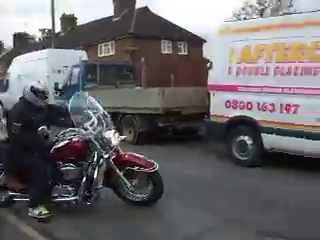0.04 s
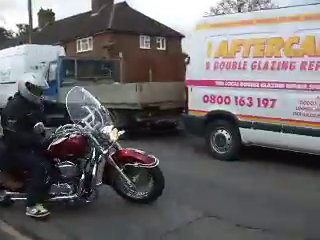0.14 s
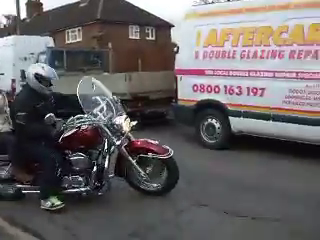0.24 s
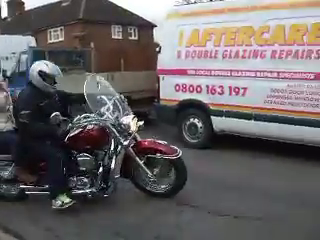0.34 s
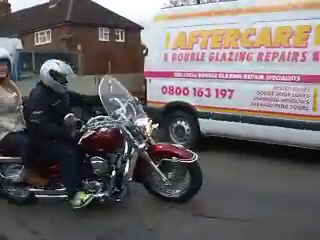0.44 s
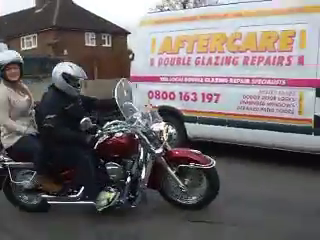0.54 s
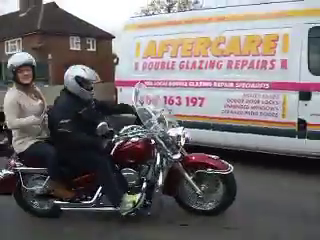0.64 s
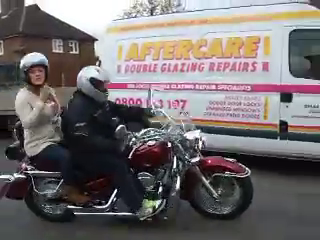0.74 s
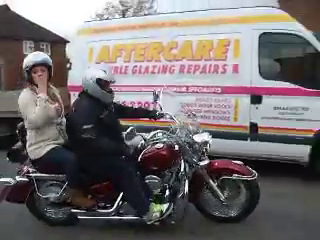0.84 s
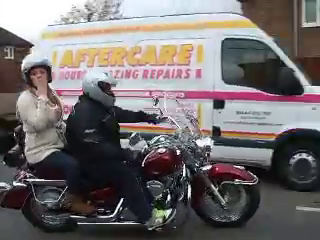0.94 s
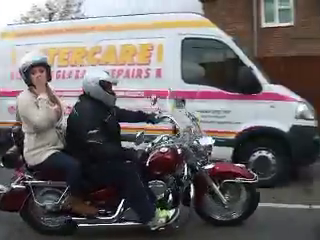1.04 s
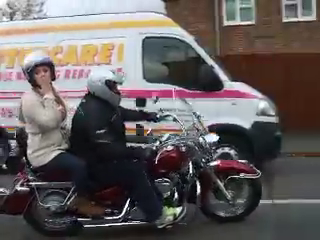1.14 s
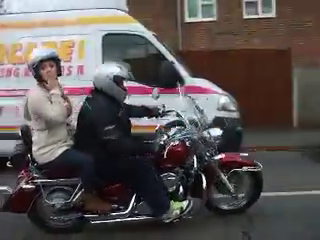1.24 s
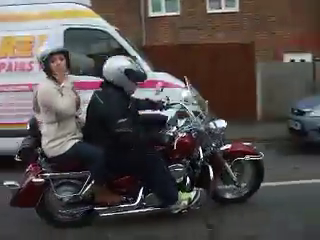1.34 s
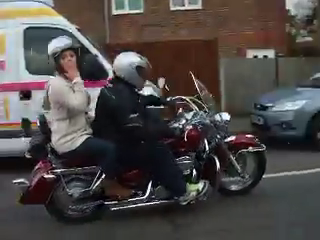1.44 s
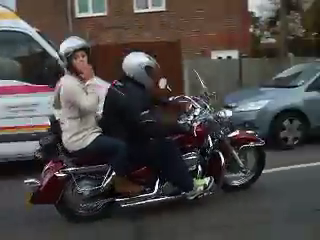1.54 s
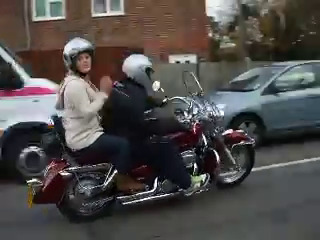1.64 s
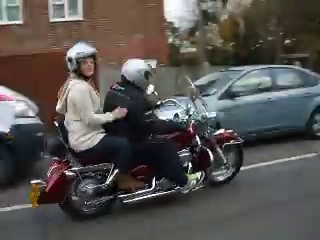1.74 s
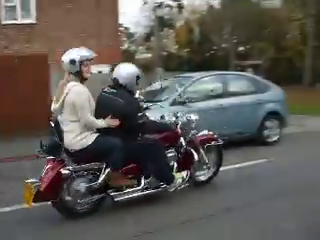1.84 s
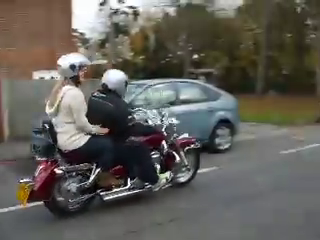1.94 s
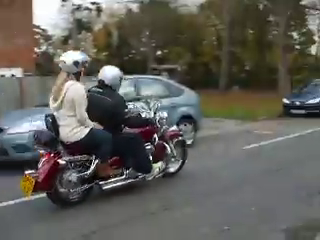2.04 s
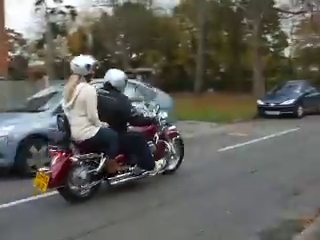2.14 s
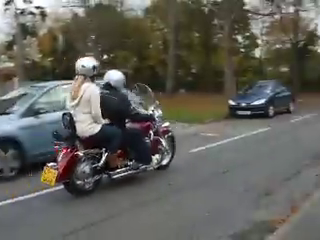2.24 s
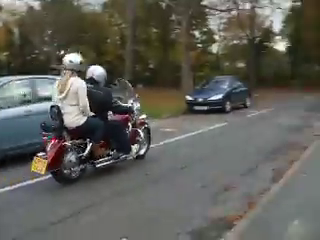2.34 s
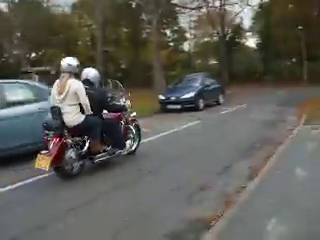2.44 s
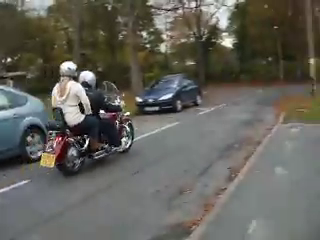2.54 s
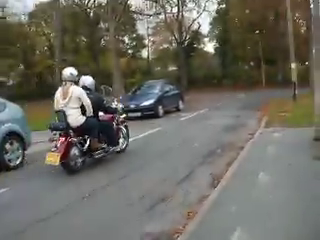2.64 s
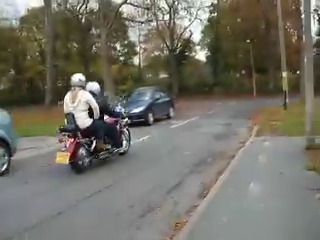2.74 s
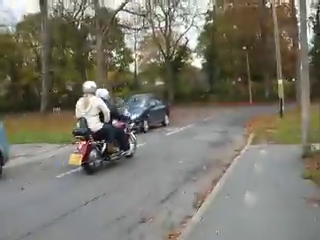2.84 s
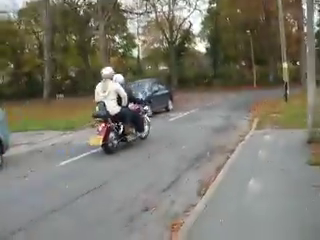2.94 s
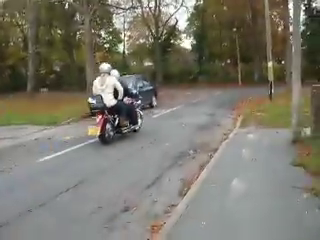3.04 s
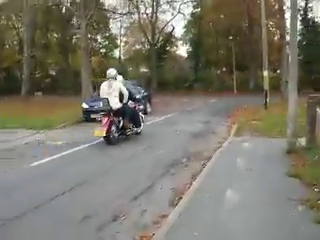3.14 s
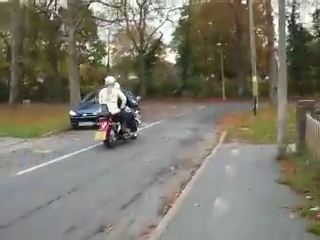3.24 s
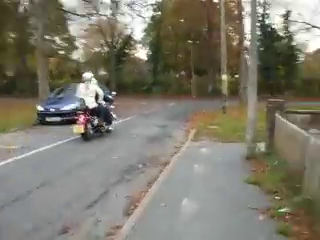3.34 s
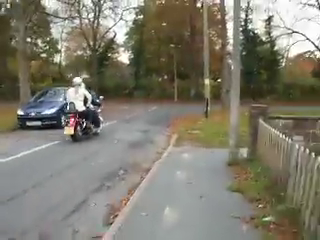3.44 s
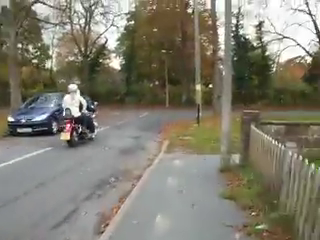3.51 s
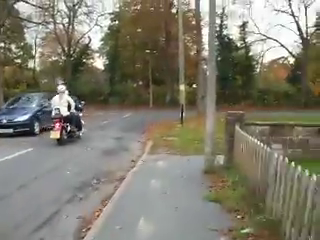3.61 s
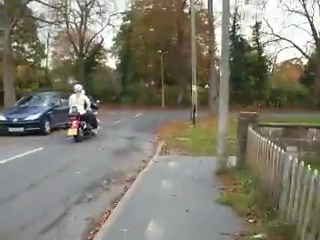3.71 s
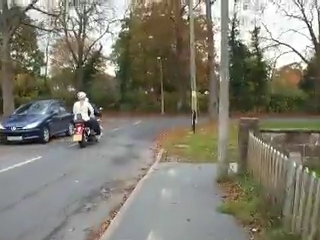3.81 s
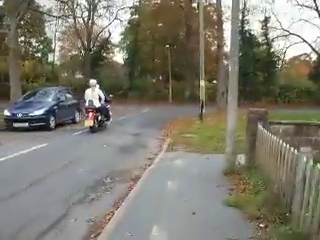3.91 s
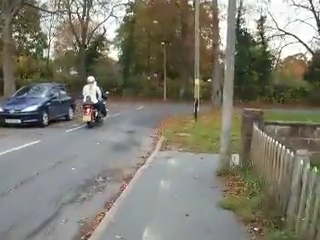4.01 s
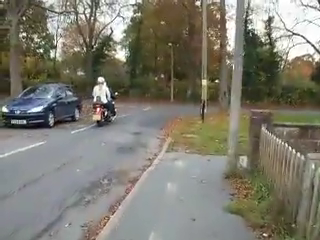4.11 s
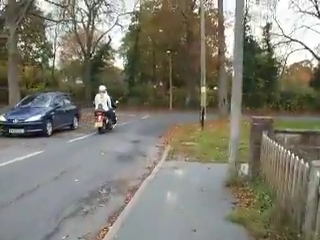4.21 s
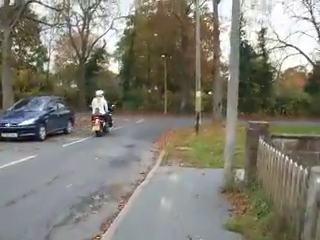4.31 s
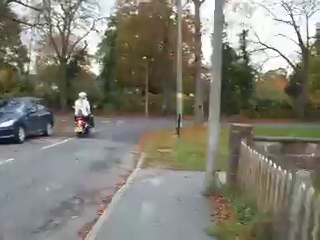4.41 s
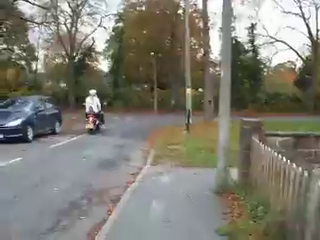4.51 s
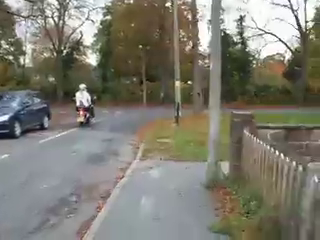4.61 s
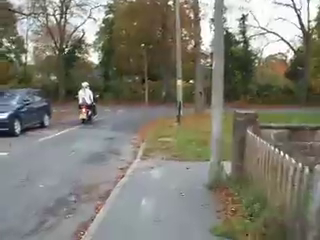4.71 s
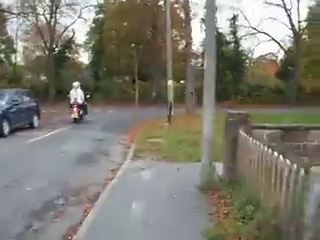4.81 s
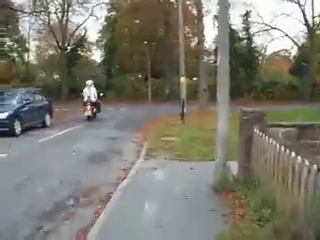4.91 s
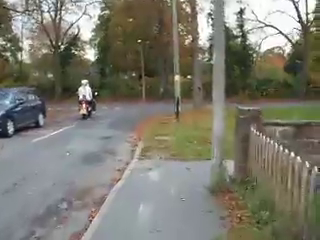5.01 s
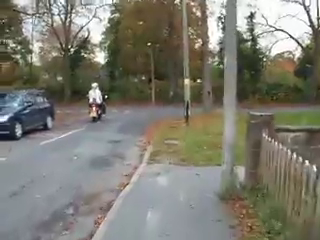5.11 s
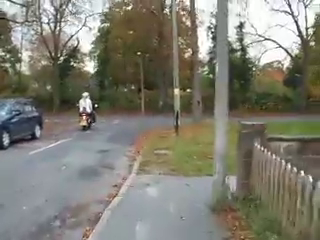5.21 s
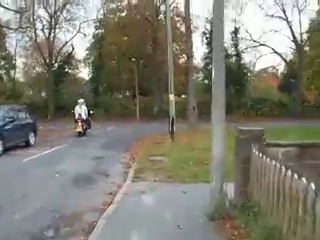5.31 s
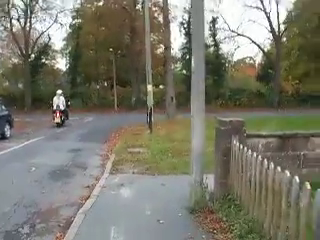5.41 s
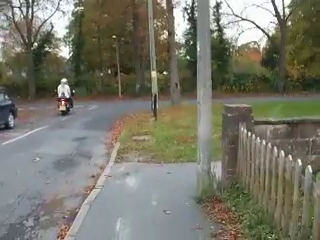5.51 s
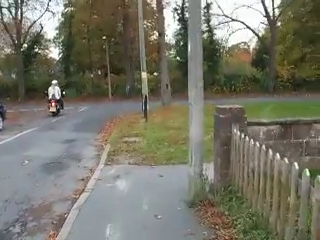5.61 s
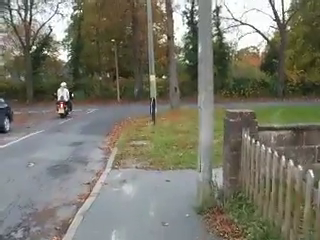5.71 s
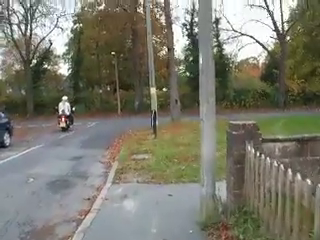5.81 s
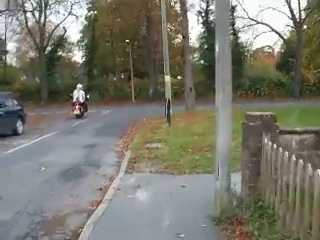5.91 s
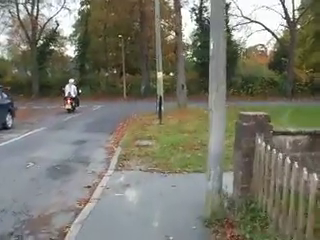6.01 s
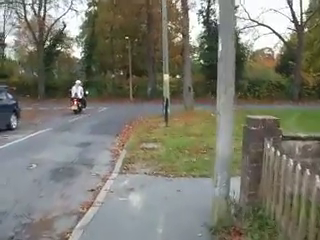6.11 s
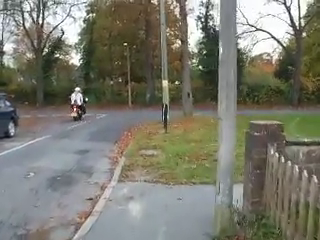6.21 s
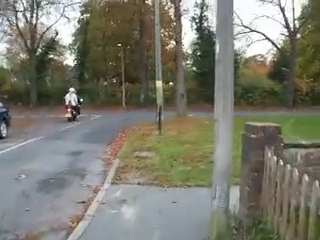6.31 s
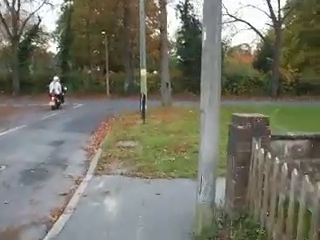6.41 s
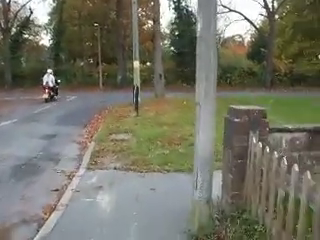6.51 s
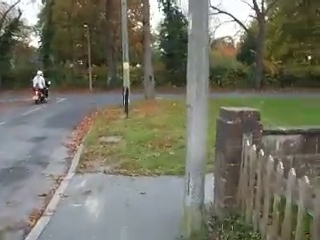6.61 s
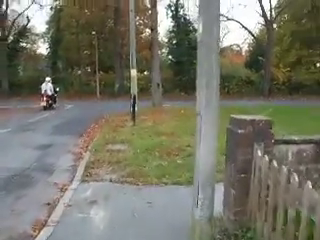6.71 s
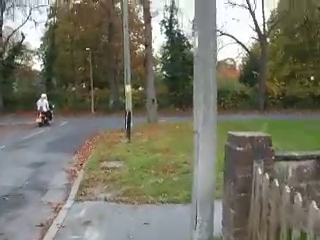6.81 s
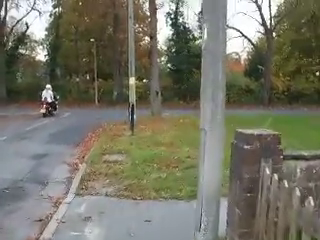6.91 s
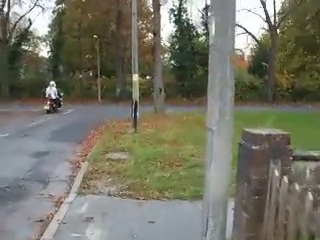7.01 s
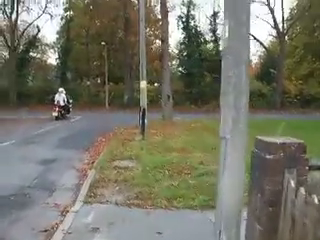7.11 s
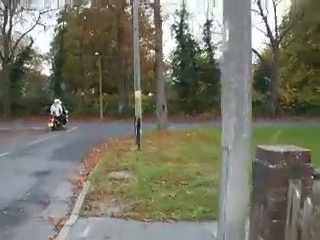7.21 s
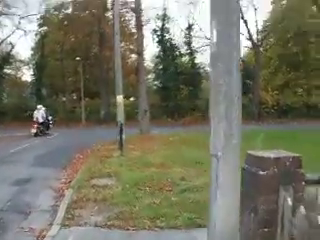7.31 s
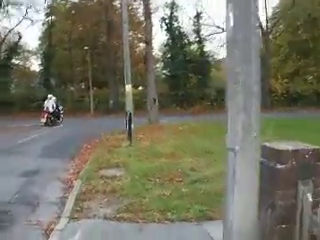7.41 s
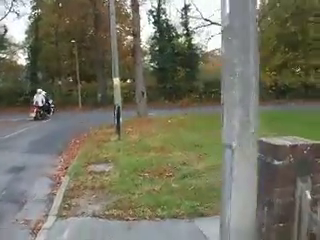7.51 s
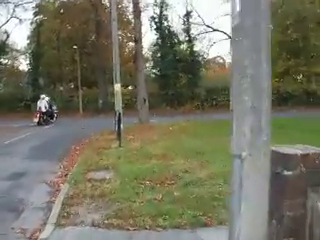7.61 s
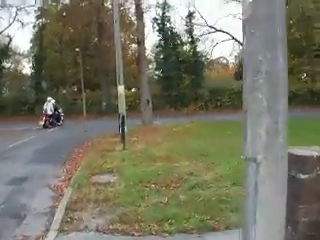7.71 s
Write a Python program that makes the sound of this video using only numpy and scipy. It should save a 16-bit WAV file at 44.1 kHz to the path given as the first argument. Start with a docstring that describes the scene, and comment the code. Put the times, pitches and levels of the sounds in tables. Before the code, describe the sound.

Outdoors at a kerb, a V-twin cruiser with open pipes pulls away about three metres off, loud, bassy and crackling, its uneven beat quickening. After three seconds the throttle shuts; a softer limping chug rolls on with dull pops and a brief howl. A sharp blip near six seconds, a short lull, then it accelerates into the distance. Light wind and road noise; the small camera microphone distorts on the loud beats.

```python
"""Suburban street, one microphone at the kerb: a V-twin cruiser with open pipes pulls away about 3 m off.
It turns its tail, shuts the throttle and rolls on beyond 10 m with a chug, dull pops and one brief howl,
then blips through a gear change and accelerates to nearly 50 m. Uneven pairs of firings send pressure slugs
into resonant pipes, with gas rush, rings and cracks from noise and sines. Delays and a diffuse tail echo
the firings; road noise, gusty wind and short low pops of noise lie beneath."""
import sys
import numpy as np
from scipy import signal
from scipy.fft import rfft, irfft
from scipy.io import wavfile
from scipy.ndimage import uniform_filter1d

SR = 44100
rng = np.random.default_rng(int(sys.argv[2]) if len(sys.argv) > 2 else 0)


def master(y):
    """Save y as 16-bit WAV."""
    cut = np.clip(np.atleast_2d(y).T, -1, 1)
    pcm = np.round(cut * 32767)  # scale
    wavfile.write(sys.argv[1], SR, pcm.astype(np.int16))


N = 341775
T = np.arange(N) / SR  # time in the scene, s
AROUND = np.arange(-600, 3000) / SR  # time around one event, s

# Road noise: roar and hiss colours, both (frequency [Hz], relative level [dB]); the hiss also colours the pops
ROAD_COLOUR = [(150, 4.5), (250, -1.5), (380, -3.5), (500, -3.5), (650, -0.5), (800, -10.5), (950, -22),
               (1300, -14), (2000, -32)]
HISS_COLOUR = [(1000, -22.5), (1700, -2.5), (2430, -7), (2640, 0), (3320, -1.5), (3740, -6.5), (4750, -5),
               (5600, -14), (7280, -39), (12300, -120)]
# Road noise level: (time [s], roar [dB], hiss [dB])
ROAD_LEVEL = [(0, -32, -45), (1.7, -42.5, -47), (2.8, -34, -49.5), (3.4, -44.5, -54), (3.83, -31, -49.5),
              (3.9, -32.5, -42.5), (3.98, -32, -51), (5, -30, -52), (6.4, -36.5, -54.5), (7.75, -35.5, -52)]
# Low rumble of the wind and of the short dull pops: (frequency [Hz], relative level [dB])
RUMBLE_COLOUR = [(20, -22.5), (35, 0.5), (65, -1), (120, -1), (220, -1.5), (350, -6.5), (600, -21.5),
                 (1200, -31)]
# Gusts on the microphone, and short dull low pops among them: (time [s], half length [s], level [dB])
GUSTS_AND_LOW_POPS = [(1.2, 2.8, -29), (3.12, 0.17, -38), (4.403, 0.16, -29), (4.775, 0.048, -28.5),
                      (4.915, 0.047, -21), (5.066, 0.071, -27), (5.182, 0.043, -27), (6.037, 0.11, -23.5),
                      (6.31, 0.011, -28), (6.437, 0.071, -30.5), (7.553, 0.72, -26.5)]
BREEZE_DB = -35

# Reflection from the nearest van or house front as the bike moves on:
# (time [s], delay [s], echo level [dB], drone drive at full throttle [dB])
WALL = [(0, 0.013, -13, 1), (.6, 0.014, -6, 3), (1.2, .012, -16, -5), (2, 0.0095, -15.5, -5),
        (2.9, 0.017, -0.5, -26), (3.4, .0098, -10.5, -7.5), (5.5, 0.0091, -9.5, -10),
        (7.75, 0.011, -19, -5)]
# Later echoes from across the street: (delay [s], level [dB])
ECHOES = [(0.0232, -13), (0.056, -25)]
STREET_T60_S, STREET_DB = 0.75, -9.5

# Bike to microphone: (time [s], distance [m])
DISTANCE = [(0, 2.95), (1.5, 2.82), (2.2, 4.75), (3, 9.4), (5, 11), (7.75, 48)]
NEAR_M = 3  # distance to which the loudness laws refer
# Throttle while pulling away, shut, trailing, blipped, shut, pulling again: (time [s], opening [0-1])
THROTTLE = [(0, 0.91), (1.8, 0.94), (2.94, 0.91), (3.0, 0.37), (3.12, 0.42), (3.5, 0), (3.78, 0.35),
            (5.2, 0.25), (5.93, 0.47), (5.98, 0.82), (6.02, 1), (6.07, 0.96), (6.11, 0.55), (6.27, 0),
            (6.55, 0.38), (6.7, 0.53), (6.95, 0.72), (7.08, 1), (7.75, 1)]
# Crank speed: (time [s], four-stroke cycles per second [Hz])
SPEED = [(0.0, 11.648), (0.56, 11.973), (1.04, 10.878), (2.22, 15.705), (2.95, 18.975), (3.29, 11.87),
         (3.75, 11.181), (3.96, 8.919), (5.2, 8.866), (5.93, 8.296), (6.02, 12.595), (6.14, 11.913),
         (6.38, 8.379), (6.88, 8.048), (7.1, 11.532), (7.25, 12.906), (7.75, 12.853)]
START_TURN = .085  # share of a cycle already turned at the start
# Rear firing after the front one: (cycles per second [Hz], share of a cycle [0-1])
REAR_LAG = [(12, .412), (18, .402)]
# Treble beamed by the pipes as the bike passes and turns its tail:
# (time [s], front crack [dB], rear crack [dB], gas rush [dB])
AIM = [(0, -2.5, -3, 4), (1.1, 0.5, 0.5, -0.5), (1.85, 3, 2, -2), (2.45, 4, -2, -5.5),
       (2.9, 0.5, -3.5, -6.5), (4, 3, 2, 4.5), (7.75, 1.5, -3, 2)]
# Off load the front cylinder gives less than the rear one, which leaves a slow chug
LIMP_THUMP_DB, LIMP_GAS_DB = -9, -7

# Single exhaust pops, on the trailing throttle and at the blip: (time [s], push level [dB], spit level [dB])
POPS = [(4.406, -7.5, -39), (4.886, -10, -26.5), (4.941, -8.5, -44), (5.099, -8.5, -44), (5.223, -9.5, -36),
        (6.023, -14.5, -15.5)]
# Brief howl in the pipes on the trailing throttle: (time [s], half length [s], level [dB])
HOWL = (4.4, 0.042, -29.5)
# Notes of the howl, applied twice: (frequency [Hz], width per pass [Hz], gain per pass [dB])
HOWL_NOTES = [(283, 10, -3), (350, 12, -8), (410, 8.4, -7)]

# Loudness laws of body, barks, cracks, gas rush and thumps, each one row:
# (level near by at full throttle [dB], loss on a shut throttle [dB], loss per doubling of distance [dB]);
# the losses with distance are small because the pipes come to aim at the microphone
BODY_LAW = (-15, 25.4, 0.96)
BARK_LAW = (-32.5, 1.2, 0.21)
CRACK_LAW = (-20, 30.6, 0.83)
GAS_LAW = (-20.5, 11, 0.16)
THUMP_LAW = (0.84, 9.9, 3.59)

# Hollow middle of a firing, heard along the pipes: (frequency [Hz], relative level [dB])
BODY_COLOUR = [(420, -4.5), (620, 3), (900, -3), (1250, -9.5), (1750, -5.5), (2000, -18), (2250, -0.5),
               (2700, -20.5)]
# Higher pipe resonances that bark: (frequency [Hz], level from the side [dB], level from behind [dB])
BARKS = [(337, -13, -11.5), (437, -23.5, -10.5), (615.6, -24.5, 1), (696, -20, -4.5), (788.6, -3, -14)]
BARK_SLIDE_PER_S = 0.94  # relative rise of pitch on a shut throttle
# Rush of the cracking jet: (frequency [Hz], relative level [dB])
CRACK_COLOUR = [(900, -27), (1400, -12), (1750, -7.5), (2050, -16.5), (2500, 0.5), (3000, 3.5), (3600, 1.5),
                (4400, -8), (5100, -5.5), (6000, -34)]
# Rings of the pipe mouths: (frequency [Hz], front pipe level [dB], rear pipe level [dB])
MOUTHS = [(1365, -9, -14.5), (1750, -12.5, -6.5), (2240, -6, -7), (2800, 1, -8.5), (3450, -3.5, -6.5)]
# Main ring of each mouth, wandering with the heat of the gas: (time [s], front pipe [Hz], rear pipe [Hz])
MAIN_RING = [(0, 2800, 2520), (.4, 2770, 2270), (.55, 2520, 3620), (1.1, 2810, 3095), (1.9, 3030, 3750),
             (2.3, 3055, 3450), (2.8, 3430, 3410), (3.5, 3096, 3180), (7.3, 3160, 3310), (7.75, 2690, 3270)]
MAIN_RING_DB = 4  # at full throttle
# Firings that crack harder, or softer where negative: (time [s], extra crack level [dB])
HARD_FIRINGS = [(.5, 4), (1.404, 2.5), (1.711, 7.5), (1.783, -2), (1.896, 4.5), (1.965, 4.5), (2.228, -1.5),
                (2.291, 1.5), (2.473, 4), (2.759, 3), (5.64, 6), (6.705, 7), (7.295, 2.5), (7.527, 2)]
# Gas rush from the side and from behind: (frequency [Hz], relative level [dB])
GAS_SIDE = [(250, -26), (350, -26), (500, -3), (650, -6), (800, 5.5), (1050, -3.5), (1350, -8), (1800, -8),
            (3000, -13)]
GAS_BEHIND = [(200, -3.5), (350, -10.5), (500, 5), (680, 8.5), (820, -12), (1000, -8.5), (1400, -11),
              (1750, -21), (2100, -16.5), (2500, -16), (3200, -39.5)]

# Slug of gas at low revs, front pipe then rear:
# (half width [s], suction share [0-1], suction half width [s], level [dB])
SLUGS = [(0.0016, 0.31, 0.0058, -8.5), (0.0014, 0.25, 0.0069, -2.5)]
# Resonances of the front and rear pipe from the side, and of both from behind:
# (frequency [Hz], width [Hz], gain [dB])
FRONT_PIPE = [(80.1, 17, 11.5), (192.6, 121, 7.5), (358, 7.5, 15)]
REAR_PIPE = [(111.7, 21.3, 6.5), (186, 18, -18.5), (254, 6.6, -11.5)]
PIPE_BEHIND = [(68, 65, -5), (99.2, 11, 7), (188.6, 21, 0.5), (268.7, 12, 3.5)]
# Low note that builds up in the pipes, from the side and from behind, applied twice:
# (frequency [Hz], width per pass [Hz], gain per pass [dB])
DRONE_SIDE = [(128.7, 39, 0.46)]
DRONE_BEHIND = [(121.5, 27, 6.3)]
DRONE_LATE_S = 0.0038  # on top of the wall delay

# Microphone: overload knee and hard clip [full scale = 1], upper band edge, final low-pass
OVERLOAD_LEVEL, CLIP_LEVEL, BAND_HZ, TOP_HZ = .76, .69, 5650, 15500


def undb(db):
    """Decibels to gain."""
    return 10 ** (np.asarray(db) / 20)


def read(table, times):
    """Every column of a curve at the given times."""
    s, *columns = np.transpose(table)
    return [np.interp(times, s, c) for c in columns]


def unit(x):
    """Scale to rms 1."""
    return x / np.sqrt(np.mean(x ** 2))


def lowpass(x, order, hz):
    """Butterworth low-pass."""
    return signal.sosfilt(signal.butter(order, hz, fs=SR, output="sos"), x)


def noise(colour):
    """Noise of rms 1 with a (Hz, dB) spectrum that falls away beyond its ends."""
    hz, db = np.transpose(colour)
    f = np.maximum(np.fft.rfftfreq(N, 1 / SR), 1)
    skirts = np.minimum(f / hz[0], 1) ** 2 * np.minimum(hz[-1] / f, 1) ** 2
    gain = skirts * undb(np.interp(np.log(f), np.log(hz), db))
    return unit(irfft(rfft(rng.standard_normal(N)) * gain, N))


def walk(rate):
    """Random levels held 1 / rate s and smoothed twice, scaled to rms 1."""
    hold = int(SR / rate)
    steps = np.repeat(rng.standard_normal(N // hold + 1), hold)
    return unit(uniform_filter1d(uniform_filter1d(steps, hold), hold)[:N])


def resonate(x, modes):
    """Sum of (Hz, width Hz, dB) resonances driven by x."""
    return sum(undb(db) * signal.lfilter(*signal.iirpeak(hz, hz / width, fs=SR), x) for hz, width, db in modes)


def place(times, shapes):
    """Lay one short shape per event (on the AROUND axis) at its time."""
    index = np.round((times[:, None] + AROUND) * SR).astype(int)
    inside = (index >= 0) & (index < N)
    return np.bincount(index[inside], shapes[inside], N)


def road():
    """Tyres, running gear and distant traffic: two coloured noises, never quite steady."""
    roar_db, hiss_db = read(ROAD_LEVEL, T)
    roar = noise(ROAD_COLOUR) * undb(roar_db + 2.5 * walk(24))
    return roar + noise(HISS_COLOUR) * undb(hiss_db + 1.7 * walk(25))


def wind_and_low_pops():
    """Gusts and short dull pops rise out of a light breeze, all low noise that flutters in quick lumps."""
    swells = sum(undb(db) * np.exp(-((T - s) / half_s) ** 2) for s, half_s, db in GUSTS_AND_LOW_POPS)
    lumps = undb(5.96 * np.tanh(walk(35)))
    return noise(RUMBLE_COLOUR) * np.hypot(undb(BREEZE_DB), swells) * lumps


def street(x):
    """Distinct dulled echoes and a diffuse tail, fed more strongly as the bike moves off."""
    age = T[:SR]
    tail = rng.standard_normal(SR) * undb(-60 * age / STREET_T60_S) * np.minimum(age / 0.0046, 1)
    tail = lowpass(tail / np.linalg.norm(tail), 1, 2500)
    tail_feed_db = np.interp(T, [2.7, 3.5], [-12, 3])
    dull = lowpass(x, 1, 900)
    echoes = sum(undb(db) * np.interp(T - delay, T, dull, left=0) for delay, db in ECHOES)
    wall_s, wall_db, _ = read(WALL, T)
    echoes = echoes + undb(wall_db) * np.interp(T - wall_s, T, dull, left=0)
    diffuse = signal.fftconvolve(x * undb(tail_feed_db), tail)[:N]
    return x + echoes + undb(STREET_DB) * diffuse


def facing(side, back):
    """Crossfade from side to tail as the pipe mouths turn towards the microphone."""
    behind = np.interp(T, [1.7, 3.1], [0, 1])
    return (1 - behind) * side + behind * back


def remote():
    """0 near by, 1 down the street, where the top of the crack is lost."""
    return np.interp(read(DISTANCE, T)[0], [9.5, 13.5], [0, 1])


def closed(times):
    """How far the throttle is shut, 0-1."""
    return 1 - np.clip(read(THROTTLE, times)[0], 0, 1)


def strength_db(times, law):
    """Firings are louder the wider the throttle and the nearer the bike."""
    near_db, shut_db, doubling_db = law
    return near_db - shut_db * closed(times) - doubling_db * np.log2(read(DISTANCE, times)[0] / NEAR_M)


def firings():
    """Time and cylinder of each firing: the rear one follows early, which gives the limping beat."""
    speed = read(SPEED, T)[0]
    turns = START_TURN + np.cumsum(speed) / SR
    cycle, rear = np.divmod(np.arange(1, 2 * int(turns[-1]) + 2), 2)
    lag = read(REAR_LAG, np.interp(cycle, turns, speed))[0]
    times = np.interp(cycle + lag * rear, turns, T, right=np.inf)
    sounding = np.isfinite(times)
    return np.round(times[sounding] * SR) / SR, rear[sounding]


def slug(width_s, suction, suction_s):
    """A rounded pressure pulse with suction on both sides."""
    return np.exp(-(AROUND / width_s) ** 2) - suction * np.exp(-(AROUND / suction_s) ** 2)


def burst(lead_s, rise_s, decay_s, tail_db, tail_s):
    """Envelope of the gas jet: it opens ahead of the pressure peak, dies fast and leaves a short tail."""
    age = np.maximum(AROUND + lead_s, 0)
    opening = 1 - np.exp(-(age / rise_s) ** 2)
    return opening * (np.exp(-age / decay_s) + undb(tail_db) * np.exp(-age / tail_s))


def crackle(depth_db):
    """The jet breaks up into eddies about a millisecond long."""
    return unit(undb(depth_db * walk(1400)))


def pops():
    """Single pops: a push followed by a suck, with a spit of gas."""
    times, push_db, spit_db = np.transpose(POPS)
    times = np.round(times * SR) / SR
    suck = np.roll(slug(0.00043, 0.32, 0.0019), int(0.0026 * SR))
    shape = slug(0.00076, 0.11, 0.0028) - 0.64 * suck
    spit = burst(lead_s=0.0026, rise_s=0.00092, decay_s=0.0011, tail_db=-22.0, tail_s=0.0037)
    pushes = place(times, undb(push_db)[:, None] * shape)
    return pushes + noise(HISS_COLOUR) * place(times, undb(spit_db)[:, None] * spit)


def howl():
    """Noise through twice-applied pipe resonances howls for a moment."""
    s, half_s, db = HOWL
    notes = unit(resonate(resonate(rng.standard_normal(N), HOWL_NOTES), HOWL_NOTES))
    return notes * undb(db) * np.exp(-((T - s) / half_s) ** 2)


def body(times, rear):
    """Down the street, in line with the pipes, each firing under load has a rough, hollow middle."""
    size = undb(strength_db(times, BODY_LAW) - 7.5 * rear + 1.7 * rng.standard_normal(len(times)))
    envelope = burst(lead_s=0.0016, rise_s=0.00091, decay_s=.0024, tail_db=-18, tail_s=0.01)
    return remote() * noise(BODY_COLOUR) * place(times, size[:, None] * envelope)


def barks(times, rear):
    """Every firing rings the higher pipe resonances; off load each ring slides upwards as it fades."""
    chance = rng.standard_normal((len(times), len(BARKS), 3))
    shut = closed(times)
    size = undb(strength_db(times, BARK_LAW) + LIMP_GAS_DB * shut * (1 - rear))[:, None]
    envelope = burst(lead_s=0.0029, rise_s=0.0022, decay_s=0.02, tail_db=-20.5, tail_s=0.0067)
    clock = AROUND + BARK_SLIDE_PER_S * shut[:, None] * AROUND ** 2 / 2
    out = 0
    for k, (hz, side_db, behind_db) in enumerate(BARKS):
        detune, phase, strength = chance[:, k].T[:, :, None]
        ring = np.sin(2 * np.pi * (hz * np.exp(0.037 * detune) * clock + phase))
        rings = place(times, size * undb(3.0 * strength) * envelope * ring)
        out = out + facing(undb(side_db), undb(behind_db)) * rings
    return out


def cracks(times, rear):
    """The jet cracks at the pipe mouth: shock front, crackling rush, and rings that differ on every firing."""
    chance = rng.standard_normal((len(times), len(MOUTHS) + 2, 3))
    shut, far = closed(times), remote()
    front_db, rear_db, _ = read(AIM, times)
    aim_db = np.where(rear, rear_db, front_db)
    hard_db = sum(db * (abs(times - s) < .012) for s, db in HARD_FIRINGS)
    scatter_db = (1.74 + 0.8 * shut) * chance[:, -1, 0]
    size = undb(strength_db(times, CRACK_LAW) + aim_db + hard_db + scatter_db)[:, None]

    front_hz, rear_hz = read(MAIN_RING, times)
    modes = [(hz, np.where(rear, rear_ring_db, front_ring_db)) for hz, front_ring_db, rear_ring_db in MOUTHS]
    modes.append((np.where(rear, rear_hz, front_hz), MAIN_RING_DB + 3 * shut))
    ring = 0
    for k, (hz, db) in enumerate(modes):
        detune, phase, strength = chance[:, k].T
        pitch = hz * np.exp(.045 * detune)
        wave = np.sin(2 * np.pi * (pitch[:, None] * AROUND + phase[:, None]))
        ring = ring + undb(db + 2.3 * strength)[:, None] * wave
    ring = ring * burst(lead_s=.0026, rise_s=.0014, decay_s=.0023, tail_db=-19, tail_s=.0065)
    rings = undb(1 - 1.0 * far) * place(times, size * ring)

    # a steep N-shaped pressure front just ahead of the firing
    across = (AROUND + .0007) / (.00012 * np.exp(.25 * chance[:, -1, 1, None]))
    shock_gain = undb(-4 + 5.8 * far - 19 * closed(T))
    shock = shock_gain * place(times, size * across * np.exp(-across ** 2))

    jet = burst(lead_s=0.004, rise_s=0.0008, decay_s=0.0017, tail_db=-13, tail_s=0.0063)
    bright = noise(CRACK_COLOUR)
    dull = signal.sosfiltfilt(signal.butter(3, 4900, fs=SR, output="sos"), bright)
    rush = undb(1 - 1.9 * closed(T)) * (bright + far * (dull - bright)) * place(times, size * jet)
    return shock + (rings + rush) * crackle(depth_db=2.0)


def gas(times, rear):
    """The turbulent rush that goes with every slug."""
    limp_db = LIMP_GAS_DB * closed(times) * (1 - rear)
    scatter_db = 1.7 * rng.standard_normal(len(times))
    size = undb(strength_db(times, GAS_LAW) + read(AIM, times)[2] + limp_db + scatter_db)
    envelope = burst(lead_s=0.0026, rise_s=0.0018, decay_s=0.0045, tail_db=-19, tail_s=0.022)
    return facing(noise(GAS_SIDE), noise(GAS_BEHIND)) * place(times, size[:, None] * envelope)


def thumps(times, rear):
    """Each slug of gas leaves its pipe and sets the air column ringing; slugs shorten as the revs rise."""
    chance = rng.standard_normal((len(times), 2))
    shut, shut_at_firing, far = closed(T), closed(times), remote()
    scatter_db = (.5 + 2.8 * shut_at_firing) * chance[:, 0]  # combustion is ragged on a shut throttle
    limp_db = LIMP_THUMP_DB * shut_at_firing * (1 - rear)
    width_s, suction, suction_s, pipe_db = np.array(SLUGS)[rear].T
    front_db = 6.3 * np.interp(times, T, far) * (1 - rear)  # from afar both pipes are heard alike
    size = undb(strength_db(times, THUMP_LAW) + pipe_db + front_db + limp_db + scatter_db)
    stretch = (12 / np.maximum(read(SPEED, times)[0], 12)) ** 0.6 * np.exp(0.03 * chance[:, 1])
    slugs = slug((width_s * stretch)[:, None], suction[:, None], (suction_s * stretch)[:, None])
    shapes = size[:, None] * slugs
    front_pulses, rear_pulses = (place(times[rear == k], shapes[rear == k]) for k in range(2))
    pulses = front_pulses + rear_pulses

    side = pulses + resonate(front_pulses, FRONT_PIPE) + resonate(rear_pulses, REAR_PIPE)
    # from behind, the direct push and the ringing both weaken off load, the push a little more
    push = pulses * undb(5.5 - 14 * shut)
    back = push + resonate(pulses * undb(5.5 - 12.0 * shut - 6 * far), PIPE_BEHIND)
    back = back - 1.0 * far * lowpass(back, 1, 90)  # the deepest bass stays near by

    wall_s, _, drone_db = read(WALL, T)
    drive = pulses * undb(drone_db + 9.9 * shut)
    drone = facing(*(resonate(resonate(drive, note), note) for note in (DRONE_SIDE, DRONE_BEHIND)))
    return facing(side, back) + np.interp(T - wall_s - DRONE_LATE_S, T, drone)


def scene():
    """The bike in its street, with pops, road noise and wind."""
    times, rear = firings()
    bike = thumps(times, rear) + gas(times, rear) + barks(times, rear)
    bike = bike + body(times, rear) + cracks(times, rear) + howl()
    return (street(bike) + pops() + road() + wind_and_low_pops())[None]


def record(dry):
    rounded = dry / (1 + (dry / OVERLOAD_LEVEL) ** 8) ** (1 / 8)
    narrow = signal.sosfilt(signal.ellip(8, .3, 70, BAND_HZ, fs=SR, output="sos"), rounded)
    narrow = signal.sosfilt(signal.butter(1, 12, "high", fs=SR, output="sos"), narrow)
    clipped = np.clip(narrow, -CLIP_LEVEL, CLIP_LEVEL)
    return signal.sosfilt(signal.ellip(8, .2, 70, TOP_HZ, fs=SR, output="sos"), clipped)


dry = scene()
out = record(dry)
master(out)
```